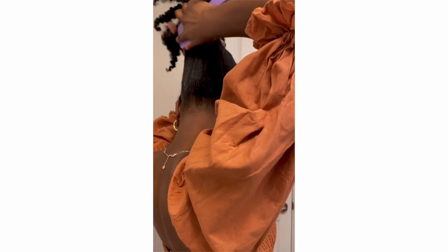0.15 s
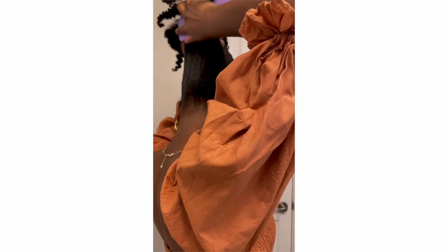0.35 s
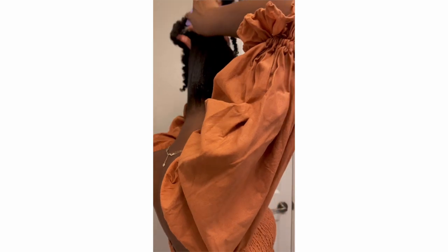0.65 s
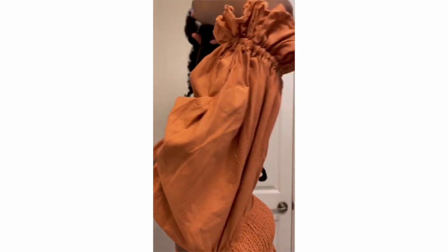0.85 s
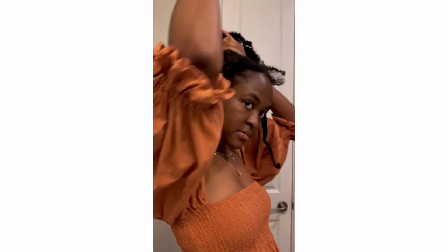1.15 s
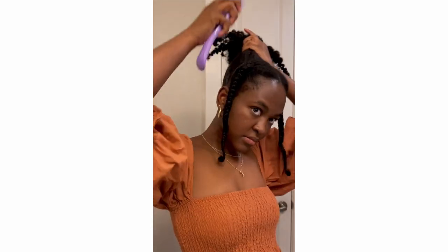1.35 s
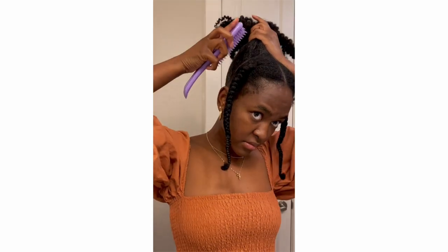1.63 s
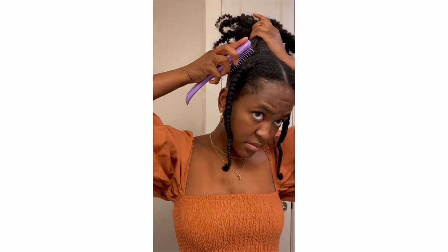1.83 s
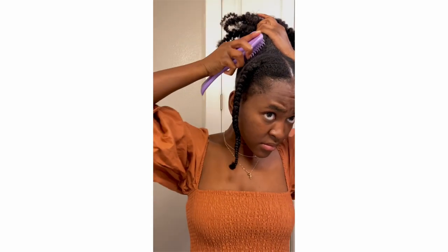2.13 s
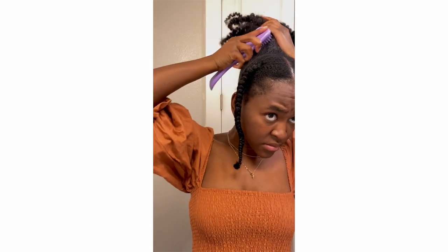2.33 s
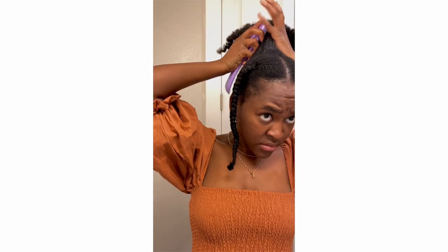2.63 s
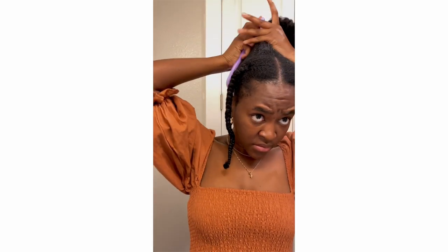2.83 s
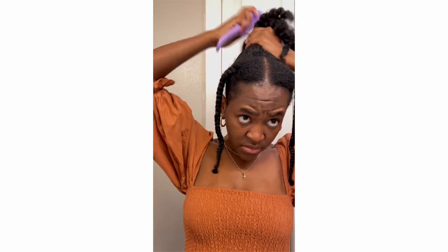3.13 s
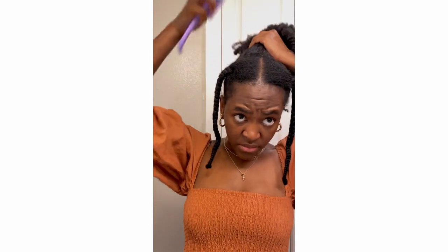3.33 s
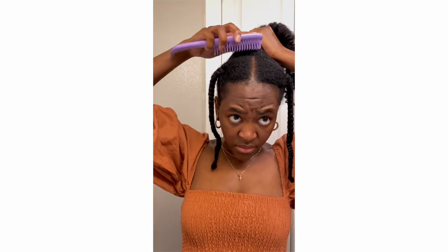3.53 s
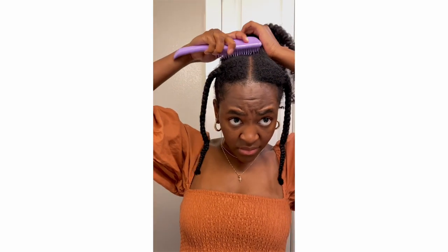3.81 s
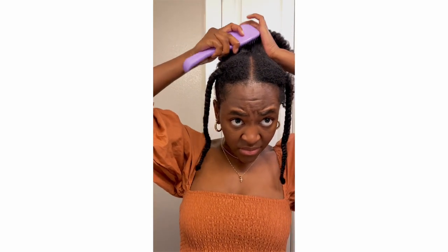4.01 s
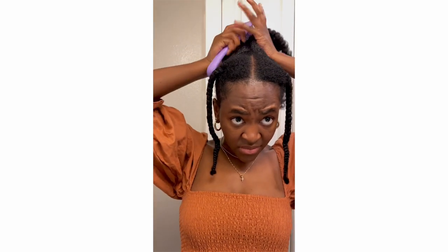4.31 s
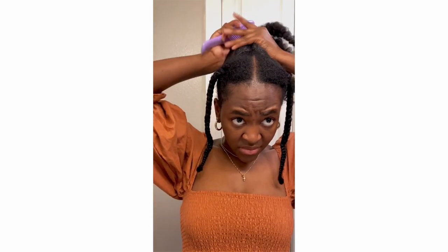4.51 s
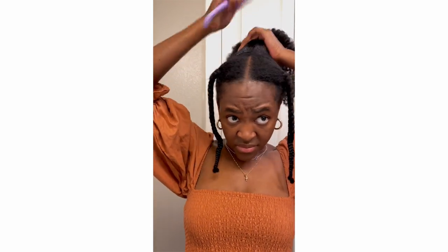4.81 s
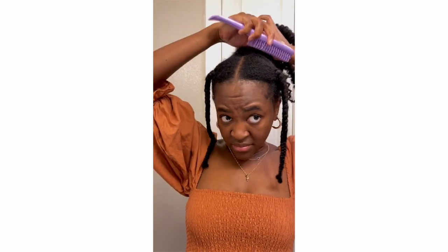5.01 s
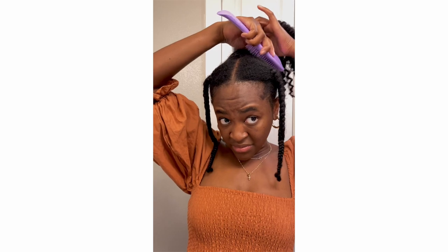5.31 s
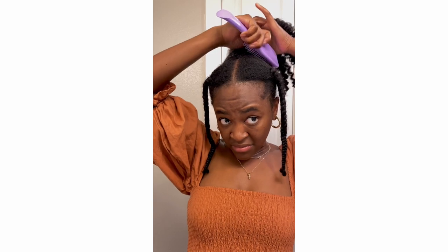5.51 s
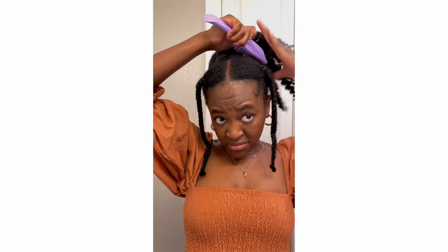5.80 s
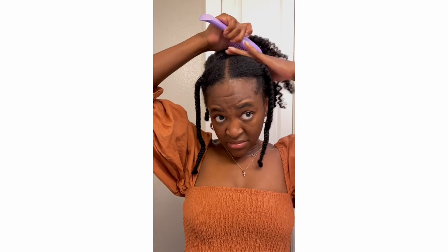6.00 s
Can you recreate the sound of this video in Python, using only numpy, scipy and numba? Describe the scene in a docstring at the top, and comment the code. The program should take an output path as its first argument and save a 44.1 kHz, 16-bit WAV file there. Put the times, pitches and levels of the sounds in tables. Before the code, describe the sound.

A plastic comb scrapes through thick hair in scratchy, slightly squeaky strokes, ticking on knots over a low fan drone.

```python
"""A plastic comb is pulled through thick, gel-coated hair in a small bathroom, close to a phone.
Over a droning fan, strands catch on the teeth and snap free in clusters, ringing comb and cupped hand.
After a second comes a lull: the floor bumps softly and a sleeve rustles. Squeaky strokes follow, then
from 3.6 s the comb ticks through knots. It knocks hardest at 5.5 s; more rustle and soft bumps lead
into one last tug."""
import sys
import numpy as np
from scipy import signal
from scipy.fft import rfft, irfft, next_fast_len
from scipy.io import wavfile
from scipy.ndimage import uniform_filter1d
from numba import njit

SR = 44100
rng = np.random.default_rng(int(sys.argv[2]) if len(sys.argv) > 2 else 0)


def store_pcm(level_fs):
    """Save levels as 16-bit WAV."""
    pcm = np.round(np.clip(level_fs, -1, 1) * 32767).astype(np.int16)
    wavfile.write(sys.argv[1], SR, np.atleast_2d(pcm).T)


N = 271215
TIME = np.arange(N) / SR
SIZE = next_fast_len(N + SR // 2)
FREQ = np.maximum(np.fft.rfftfreq(SIZE, 1 / SR), 1)


def undb(db):
    """Decibels to gain."""
    return 10 ** (np.asarray(db) / 20)


def unit(x):
    """Scale to rms 1."""
    return x / np.sqrt(np.mean(x ** 2))


def shape(x, gain):
    """Filter by a gain for each frequency."""
    return irfft(rfft(x, SIZE) * gain, SIZE)[..., :N]


def colour(points):
    """EQ curve through (frequency [Hz], level [dB]) points."""
    hz, db = np.transpose(points)
    return undb(np.interp(np.log(FREQ), np.log(hz), db))


def walk(rate_hz):
    """Smooth random modulation of rms 1, mostly slower than rate_hz."""
    return unit(shape(rng.standard_normal(N), 1 / (1 + (FREQ / rate_hz) ** 2)))


def split(x):
    """Body, rasp and crackle bands of a sound, each held near rms 1."""
    low, low_and_mid = (1 / (1 + (FREQ / edge_hz) ** 12) for edge_hz in (1700, 5000))
    bands = shape(x, np.array([low, low_and_mid - low, 1 - low_and_mid]))
    return bands / np.sqrt(uniform_filter1d(bands ** 2, size=4000))


@njit
def resonate(x, hz, width, lift):
    """Moving bell EQ: the input plus a state-variable band-pass."""
    y = np.empty(len(x))
    band_state, low_state = 0., 0.
    for i in range(len(x)):
        tuning = np.tan(np.pi * hz[i] / SR)
        loss = width[i] / hz[i] / np.sqrt(lift[i])
        band = (band_state + tuning * (x[i] - low_state)) / (1 + tuning * (tuning + loss))
        band_state = 2 * band - band_state
        low_state += 2 * tuning * band
        y[i] = x[i] + (lift[i] - 1) * loss * band
    return y


def snaps(per_s, spread_db, cluster_db, cluster_hz, hiss):
    """Strands slip free in bunches, each a click of its own size, over the hiss of sliding."""
    clicks = (rng.random(N) < per_s / SR) * rng.choice([-1, 1], N)
    sizes = undb(spread_db * np.minimum(rng.exponential(size=N), 4))
    grain = unit(clicks * sizes) + hiss * rng.standard_normal(N)
    return unit(grain * undb(cluster_db * walk(cluster_hz)))


def pull():
    """Body, rasp and crackle envelopes: each stroke takes hold, drags and lets go."""
    # tugs and light touches; deep drag rings the hollow body, snagging at the tips crackles:
    # (time [s], attack [s], hold [s], rasp drive [dB], body over rasp [dB], crackle over rasp [dB])
    strokes = [(0, 0.21, 0.0074, -31.5, -3.5, -14.5), (0.054, 0.017, 0.12, -35, -1.5, -16),
               (0.254, 0.033, 0.016, -32.5, -4, -15), (0.32, 0.032, 0.093, -36.5, -2.5, -15),
               (0.437, 0.025, 0.44, -59, -1, -15), (0.547, 0.04, 0.0033, -23.5, 0, -14),
               (0.785, 0.047, 0.13, -36, 0, -15), (0.993, 0.017, 0.41, -68.5, -2.5, -4.5),
               (1.51, 0.067, 0.029, -57, -8, -7.5), (1.6, 0.03, 0.64, -75.5, -1, -4),
               (1.693, 0.021, 0.022, -49, -16, -10.5), (1.802, 0.02, 0.075, -49.5, -0.5, -12),
               (1.962, 0.03, 0.065, -51, 0, -11), (2.065, 0.042, 0.08, -37.5, -2.5, -10.5),
               (2.148, 0.027, 0.026, -30, -2, -11.5), (2.241, 0.014, 0.043, -35, -4.0, -13),
               (2.321, 0.034, 0.087, -33, -2.5, -12.5), (2.469, 0.041, 0.028, -31, -4, -15.5),
               (2.549, 0.036, 0.11, -35.5, -4, -14), (2.661, 0.019, 0.11, -36, -3.5, -16),
               (2.836, 0.01, 0.004, -34, -6, -15), (2.872, 0.0022, 0.067, -32.5, -3, -21),
               (2.897, 0.017, 0.045, -32.5, 1.5, -13), (3.085, 0.038, 0.0036, -32.5, 0.5, -14),
               (3.352, 0.33, 0.065, -64.5, -8, -4.5), (3.5, 0.026, 0.1, -71.5, 1.5, -3.5),
               (3.611, 0.014, 0.019, -50.5, 5, -7), (3.711, 0.037, 0.047, -45, 1.5, -7.5),
               (3.754, 0.002, 0.011, -35, 1, -10), (3.772, 0.0064, 0.053, -29.5, -5, -9),
               (3.802, 0.014, 0.03, -27, -5.5, -8.5), (3.892, 0.073, 0.11, -32, -1, -8.5),
               (4.045, 0.023, 0.15, -40.5, 0, -13), (4.239, 0.0033, 0.089, -42.5, 2, -11.5),
               (4.284, 0.046, 0.14, -39, 2, -12.5), (4.488, 0.019, 0.073, -39.5, 3.5, -11.5),
               (4.61, 0.021, 0.035, -43, 5, -11.5), (4.795, 0.016, 0.4, -81.5, -4, 0),
               (5.107, 0.056, 0.075, -52.5, 5.5, -7), (5.236, 0.035, 0.062, -51.5, 1.5, -7.5),
               (5.312, 0.039, 0.11, -49.5, 1.5, -6.5), (5.424, 0.0074, 0.11, -48, 0.5, -9.5),
               (5.578, 0.062, 0.06, -48, 2.5, -16), (5.695, 0.054, 0.16, -60.5, -4.5, -15),
               (5.882, 0.034, 0.17, -66, 1.5, -7), (5.953, 0.0093, 0.085, -52.5, -3.5, -13.5),
               (6.097, 0.038, 0.028, -32, 2.5, -9.5)]
    release_s, trail_s, trail_db = 0.066, 0.063, -31
    power = 0
    for s, attack, hold, rasp_db, body_db, crackle_db in strokes:
        since_hold = TIME - s - hold
        takes_hold = (1 + np.tanh((TIME - s) / attack)) / 2
        lets_go = (1 - np.tanh(since_hold / release_s)) / 2
        trail = undb(trail_db) * np.exp(-np.maximum(since_hold, 0) / trail_s)  # a few strands slide on
        gains = undb(rasp_db + np.array([body_db, 0, crackle_db]))
        power += np.outer(gains ** 2, takes_hold ** 2 * (lets_go ** 2 + trail ** 2))
    return np.sqrt(power)


def comb_and_hand(slips, firm):
    """Hand hollow, comb spine and teeth ring under a firm pull; free length sets the teeth's pitch."""
    # how the comb is held: (from time [s], hollow [Hz], lift [dB], spine [Hz], lift [dB],
    # tooth [Hz], lift [dB], upper tooth [Hz], lift [dB], finger damping [factor on widths])
    grips = [ (0, 680, 4, 1040, 15, 2630, 13.5, 3670, 9, 1.36),
             (0.48, 765, 2.5, 1040, 11, 2645, 8.5, 3570, 10, 0.97),
             (0.72, 790, 6.5, 1070, 9, 2646, 11, 3590, 12, 0.66),
             (1.68, 730, -2, 1200, 2, 2190, 2, 3430, -4, 0.5),
             (1.871, 740, 2, 1230, 8, 2070, 22, 3420, 1, 2.2),
             (2.05, 770, 5, 1310, 10.5, 2100, 10, 3370, 9.5, 1.57),
             (2.45, 745, 0.5, 1210, 8.5, 2035, 14, 3370, 10.5, 0.88),
             (2.82, 756, 8, 1330, 4.5, 2100, 15, 3240, 19.5, 1.26),
             (2.96, 743, 8, 1240, -1.5, 2360, 11.5, 3270, 10, 1.3),
             (3.59, 810, 10, 1210, 12.5, 2700, 4.5, 3350, 2, 0.67),
             (3.87, 800, 9, 1190, 9.5, 2760, 6, 3370, 6, 1.3),
             (4.22, 778, 9.5, 1320, 9, 2820, 4, 3440, 8, 0.95),
             (4.46, 780, 18, 1200, 9, 2820, 9, 3430, 9, 0.98),
             (5.04, 665, 7.5, 1160, 14, 2630, 0.5, 3270, 1.5, 1.3),
             (5.58, 710, -7, 1140, 3.5, 2430, 4, 3280, -4, 1.6),
             (5.945, 805, 8, 1180, 7.5, 2420, -13, 3380, 2.5, 0.46)]
    # ring widths before damping: (hollow [Hz], spine [Hz], tooth [Hz], upper tooth [Hz])
    ring_widths = [160, 400, 260, 520]
    held = np.searchsorted([row[0] for row in grips[1:]], TIME)
    steps = np.array(grips, float)[held, 1:].T
    *rings, damping = uniform_filter1d(steps, size=1300)  # one grip glides into the next
    for hz, lift_db, width in zip(rings[0::2], rings[1::2], ring_widths):
        wander = 1 + .017 * walk(18)  # the changing load bends the pitch
        press_db = 2.5 * walk(20)  # fingers press and ease
        slips = resonate(slips, hz * wander, width * damping, undb((lift_db + press_db) * firm))
    return slips


def combing(body_db, rasp_db, crackle_db):
    """Snapping strands ring the comb (mono); loose hairs rustle all around it (stereo)."""
    # tone of the bare strands: (frequency [Hz], level [dB])
    strand_eq = [(100, -20.5), (210, -11), (380, -10), (510, -4.5), (700, 4.5), (920, 0), (1480, 0),
                 (1780, -7.5), (2500, -4.5), (3800, -8.5), (5500, -5), (8000, -1.5), (11000, -7.5),
                 (15500, -5.5)]
    # band trims of the loose hairs: (body [dB], rasp [dB], crackle [dB])
    loose_db = [-10.5, -11.5, -6]
    strand_tone = colour(strand_eq)
    slips = snaps(per_s=3600, spread_db=3.4, cluster_db=1.6, cluster_hz=70, hiss=.5)
    envelopes = pull()
    firm = envelopes[1] > undb(-66.5)  # a lighter touch switches the rings off
    ringing = comb_and_hand(shape(slips, strand_tone), firm)
    comb = undb([body_db, rasp_db, crackle_db]) @ (envelopes * split(ringing))
    loose_hairs = []
    for _ in "LR":
        hairs = snaps(per_s=3000, spread_db=2.6, cluster_db=1.1, cluster_hz=90, hiss=.8)
        loose_hairs.append(undb(loose_db) @ (envelopes * split(shape(hairs, strand_tone))))
    return comb, np.array(loose_hairs)


def fan(air_db, waver_db):
    """Rumbling air and a wavering mains hum; the lows sit in the centre, the hiss spreads wide."""
    # tone of the moving air: (frequency [Hz], relative level [dB])
    air_eq = [(25, -25), (40, 2.5), (58, 10), (80, 2), (100, -15), (125, 6.5), (150, -19), (300, -16),
              (700, -24), (2000, -37.5), (15000, -76)]
    # partials of the hum: (frequency [Hz], level [dB])
    partials = [(60, -59.5), (120, -59), (208, -74)]
    mid, side = rng.standard_normal((2, N))
    side = shape(side, np.minimum(FREQ / 700, 1))
    air = unit(shape(mid + np.array([side, -side]), colour(air_eq)))
    hum = 0
    for hz, db in partials:
        amplitude = np.sqrt(2) * undb(db + waver_db * walk(39))
        hum += amplitude * np.sin(2 * np.pi * hz * TIME + 0.65 * walk(15))
    return undb(air_db) * air + hum


def tooth_squeaks():
    """Strands stick and slip along one tooth; it sings unevenly, gliding as the hair moves."""
    # squeaks: (centre [s], half length [s], pitch at centre [Hz], glide [Hz/s], width [Hz], level [dB])
    squeaks = [(0.11, 0.08, 2590, 0, 130, -50), (0.352, 0.07, 2625, 0, 130, -50),
               (0.561, 0.039, 2590, 0, 130, -43), (1.99, 0.1, 2130, -150, 161, -74),
               (2.14, 0.093, 2043, 197, 150, -46), (2.37, .09, 2088, -3, 170, -44),
               (2.64, 0.11, 2111, 0, 149, -41.5), (2.93, 0.031, 2218, 2198, 140, -39),
               (3.799, 0.022, 2724, 3998, 300, -37), (3.96, 0.028, 2857, 500, 200, -39),
               (4.15, 0.086, 2870, -500, 160, -53), (4.86, 0.064, 2520, -300, 150, -79),
               (5.342, 0.017, 3355, 0, 140, -51), (5.73, 0.11, 2525, 0, 260, -62)]
    out = np.zeros(N)
    for s, half, hz, glide, width_hz, db in squeaks:
        near = abs(TIME - s) < 3 * half
        t = TIME[near] - s
        lowpass = signal.butter(2, width_hz / 2, fs=SR, output="sos")
        slip = signal.sosfilt(lowpass, rng.standard_normal((2, N)))[:, near]
        phase = 2 * np.pi * (hz * t + glide * t ** 2 / 2)
        ring = unit(slip[0] * np.cos(phase) + slip[1] * np.sin(phase))
        out[near] += undb(db) * ring * np.exp(-(t / half) ** 2)
    return out


def thuds_and_swell():
    """Soft low thuds, and one slow swell of the fan's rumble near 2.4 s."""
    # low tones that rise and die away: (time [s], pitch [Hz], peak level [dB], rise [s])
    low_tones = [(0.96, 111, -41, 0.021), (1.363, 130, -48, 0.043), (1.364, 61.7, -30, 0.035),
                 (1.437, 57.2, -30, 0.026), (2.332, 56.85, -45.5, 0.14), (5.665, 114, -49, 0.028),
                 (5.744, 65, -41, 0.017)]
    out = 0
    for s, hz, db, rise in low_tones:
        t = np.maximum(TIME - s, 0)
        envelope = (t / rise * np.exp(1 - t / rise)) ** 2
        out += undb(db) * envelope * np.sin(2 * np.pi * hz * t)
    return out


def comb_ticks(crack_s, tear_s):
    """A sharp crack, a damped plastic ring, a pop in the cupped hand and a spray of freed strands."""
    # knocks on fingers and catches in knots: (time [s], ring [dB], crack [dB], tear [dB], pop [dB])
    knocks = [(1.095, -64, -41, -62, -75), (1.9675, -47, -42, -51, -52), (2.874, -35, -38, -41, -37),
              (3.603, -52, -45, -56, -56), (3.7552, -37, -26, -37, -45), (3.7765, -44, -26, -34, -52),
              (3.887, -44, -29, -40, -50), (4.2371, -38, -39, -45, -34), (4.414, -33, -45, -44, -35),
              (4.513, -34, -47, -46, -30.5), (4.557, -44, -52, -56, -38), (4.641, -42, -50, -55, -37),
              (4.6747, -35, -40, -47, -30), (5.5042, -23.5, -32, -39, -38), (5.538, -32, -46, -56, -44),
              (5.603, -70, -41, -60, -75), (5.762, -66, -44, -62, -75), (5.782, -49, -42, -57, -60),
              (5.951, -66, -33, -44, -75)]
    # modes of the plastic comb: (frequency [Hz], relative level [dB], T60 [s])
    modes = [(890, -3, 0.36), (1100, 15, 0.088), (1364, 13.5, 0.038), (1930, 17, 0.0073),
             (3300, 21.5, 0.0084)]
    # EQ on crack and tear: (frequency [Hz], gain [dB])
    crack_eq = [(100, -22), (400, -10), (700, -1), (1200, -4), (2500, -2), (5000, -2.5), (9000, 1.5),
                (12000, -1), (15500, -13)]
    hollow_hz, pop_swell_s, pop_t60_s = 807, .001, .04
    rings, cracks = np.zeros((2, N + SR))
    t = TIME[:SR // 8]
    for s, ring_db, crack_db, tear_db, pop_db in knocks:
        detune = 1 + .025 * rng.standard_normal(len(modes))
        ring = sum(undb(db - 60 * t / t60) * np.sin(2 * np.pi * hz * ratio * t)
                   for (hz, db, t60), ratio in zip(modes, detune))
        pop_envelope = undb(pop_db - 60 * t / pop_t60_s) * np.tanh(t / pop_swell_s)
        pop = pop_envelope * np.sin(2 * np.pi * hollow_hz * detune[0] * t)
        crack = rng.choice([-1, 1], len(t)) * np.exp(-t / crack_s)
        tear = rng.laplace(size=len(t)) * np.exp(-t / tear_s)
        start = int(s * SR)
        rings[start:start + len(t)] += undb(ring_db) * ring / abs(ring).max() + pop
        cracks[start:start + len(t)] += undb(crack_db) * crack + undb(tear_db) * tear
    return rings[:N] + shape(cracks[:N], colour(crack_eq))


def sleeve_rubs():
    """Cloth and palm brush past with a soft, low grain; folds of the sleeve add a dry rustle."""
    # passes of the sleeve: (centre [s], half length [s], rub [dB], rustle [dB])
    passes = [(1.184, 0.05, -62.5, -68), (1.265, 0.057, -83, -76), (4.887, 0.19, -67.5, -104),
              (5.685, 0.082, -58, -70), (5.793, 0.057, -64, -62.5)]
    # tone of the dull rub: (frequency [Hz], relative level [dB])
    rub_eq = [(60, -16), (140, -13), (380, -15.5), (600, -20), (900, -30), (3000, -35.5)]
    # tone of the dry folds: (frequency [Hz], relative level [dB])
    rustle_eq = [(200, -19), (600, -4), (1200, 4), (2300, 2), (3500, 1), (7000, -20), (15000, -33)]
    grain = snaps(per_s=1600, spread_db=1.5, cluster_db=1.5, cluster_hz=30, hiss=0.27)
    rub = unit(shape(grain, colour(rub_eq)))
    rustle = unit(shape(grain, colour(rustle_eq)))
    return sum((undb(rub_db) * rub + undb(rustle_db) * rustle) * np.exp(-((TIME - s) / half) ** 2)
               for s, half, rub_db, rustle_db in passes)


def bathroom(x, shared_db, diffuse_db, early_t60_s, room_t60_s):
    """Close walls add a short tail; the phone's stereo processing widens the sound."""
    # the processing shifts left against right: (frequency [Hz], lead of the left [rad])
    stereo_phase = [(0, 0), (780, .4), (1100, -.2), (2400, .7), (5200, .4), (6900, 2.9), (8100, 3.4),
                    (9700, 6.1), (11200, 6.3), (12700, 9.1), (14400, 9.7), (15800, 12.2)]
    t = TIME[:SR // 2]
    # mirror and door answer first, then the whole room
    fade = (undb(-60 * t / early_t60_s) + undb(-60 * t / room_t60_s)) * (t > .001)
    tails = rng.standard_normal((3, len(t))) * fade  # shared, left, right
    tails /= np.linalg.norm(tails, axis=1, keepdims=True)
    tails = rfft(tails, SIZE) * colour([(4000, 0), (7000, -8)])
    phase = np.interp(FREQ, *np.transpose(stereo_phase))
    widen = np.exp(.5j * np.array([phase, -phase]))
    response = widen * (1 + undb(shared_db) * tails[0]) + undb(diffuse_db) * tails[1:]
    # the walls ripple the spectrum finely but favour no broad band
    power = abs(response) ** 2
    flatten = np.sqrt(uniform_filter1d(power, size=24000) / uniform_filter1d(power, size=900))
    return shape(x, response * flatten)


def scene():
    """Comb and sleeves sound through the room; loose hairs, thuds and fan are mixed in dry."""
    comb, loose_hairs = combing(body_db=-4.0, rasp_db=-3.0, crackle_db=6.0)
    near = comb + comb_ticks(crack_s=.0013, tear_s=.005) + tooth_squeaks() + sleeve_rubs()
    room = bathroom(near, shared_db=-5.0, diffuse_db=-1.8, early_t60_s=.035, room_t60_s=0.18)
    return room + loose_hairs + thuds_and_swell() + fan(air_db=-57.0, waver_db=3.5)


def record(dry):
    """The phone cuts the top steeply at 15.9 kHz."""
    return signal.sosfilt(signal.ellip(10, .2, 70, 15900, fs=SR, output="sos"), dry)


dry = scene()
out = record(dry)
store_pcm(out)
```